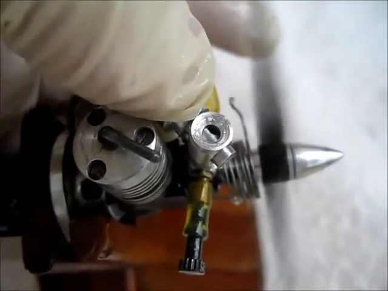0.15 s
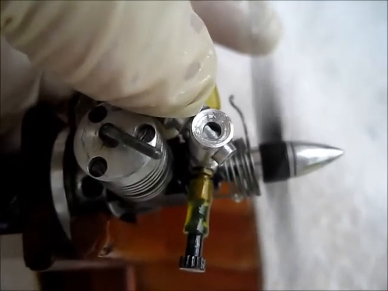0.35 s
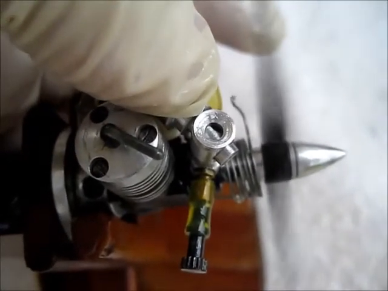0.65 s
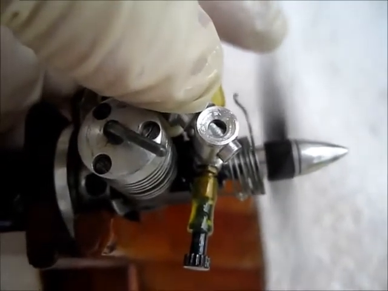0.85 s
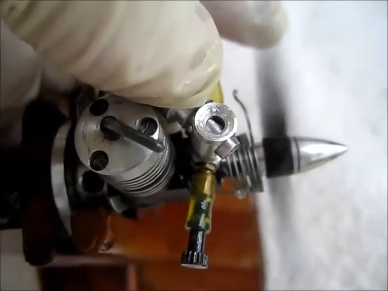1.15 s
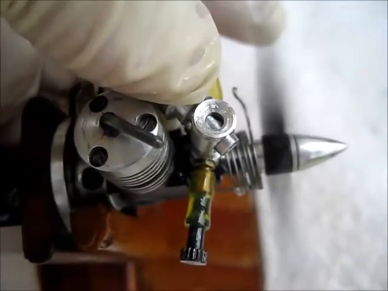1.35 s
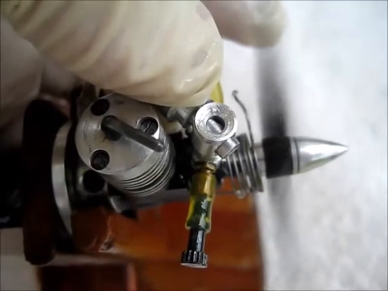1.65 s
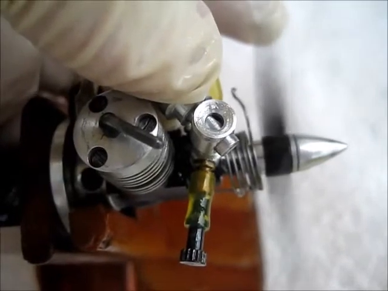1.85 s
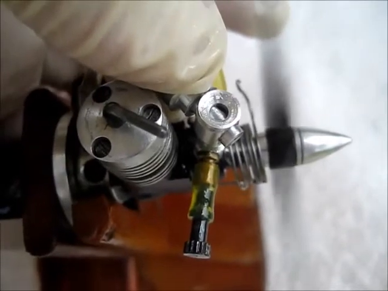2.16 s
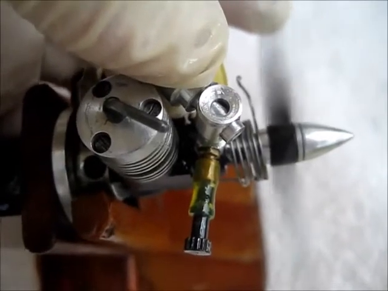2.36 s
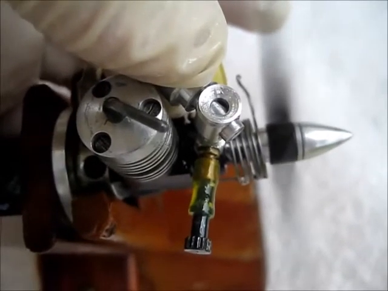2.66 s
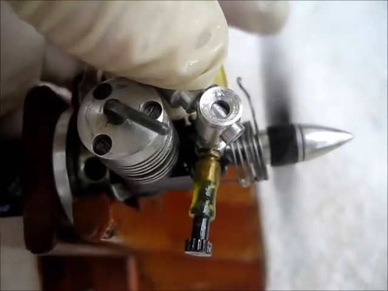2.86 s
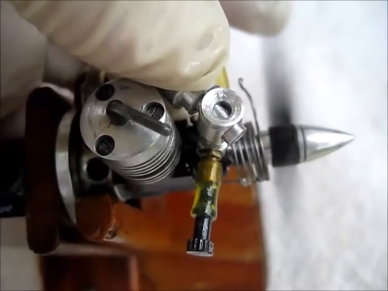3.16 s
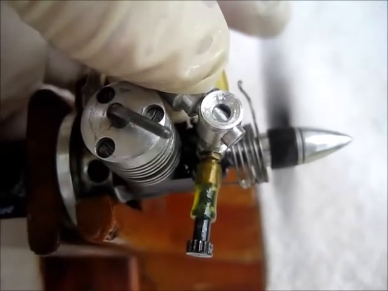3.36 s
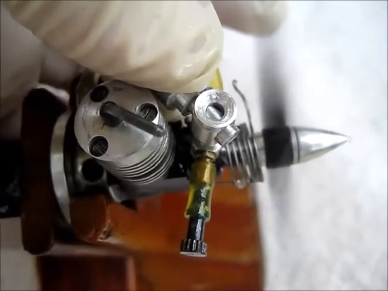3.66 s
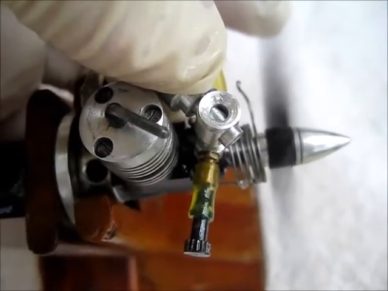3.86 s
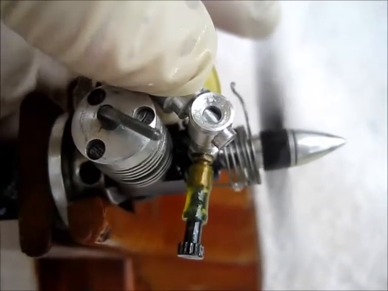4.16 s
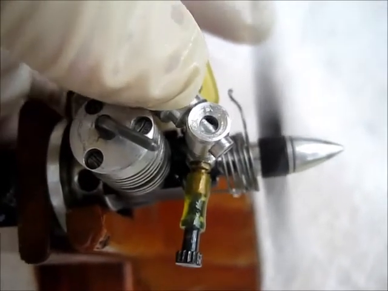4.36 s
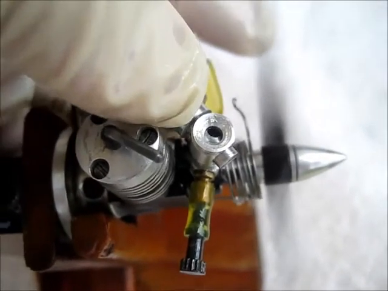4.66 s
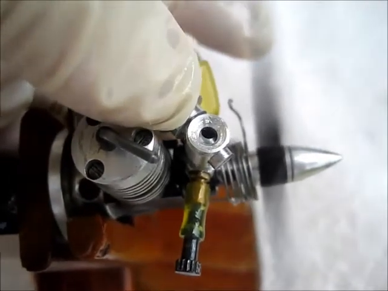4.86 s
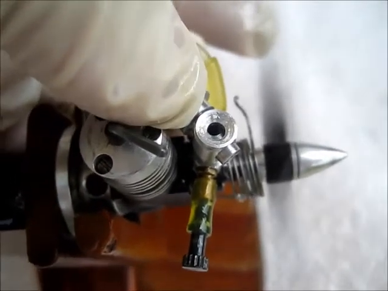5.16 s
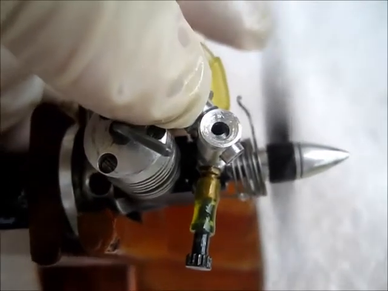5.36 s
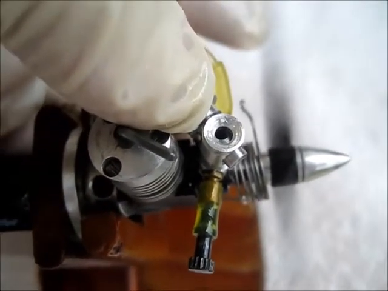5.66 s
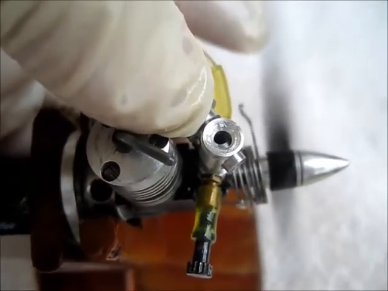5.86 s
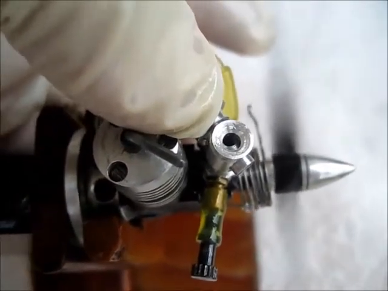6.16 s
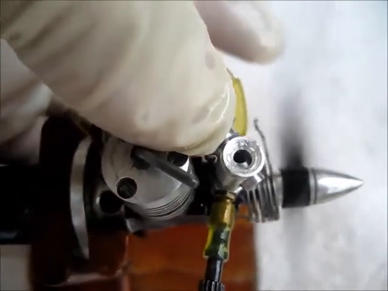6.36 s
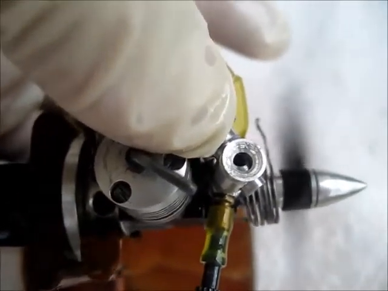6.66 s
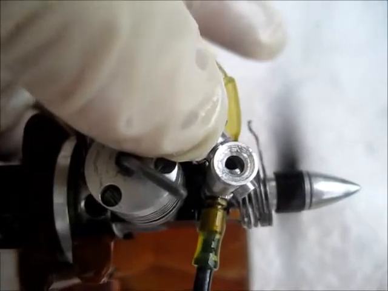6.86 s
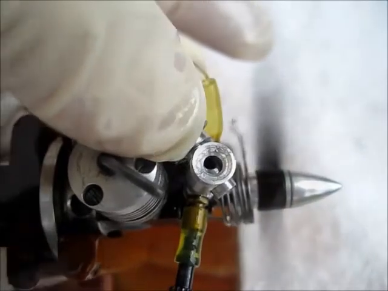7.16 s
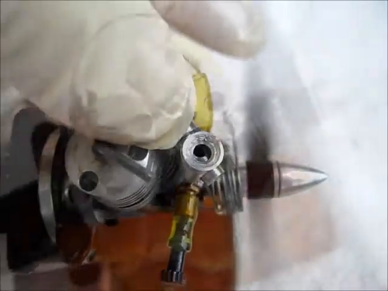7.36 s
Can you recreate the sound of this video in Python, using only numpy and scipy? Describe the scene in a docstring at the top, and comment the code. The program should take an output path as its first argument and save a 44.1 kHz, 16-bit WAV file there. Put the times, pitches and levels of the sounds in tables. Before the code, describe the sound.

A tiny two-stroke model engine buzzes very close, harsh and high-pitched, with small stumbles and rattling spells, its buzz doubling after a thump near the end.

```python
"""Indoors at an engine stand, microphone very close: a tiny two-stroke model diesel at about 11000 rpm.
Every turn fires one sharp exhaust crack with a puff of hiss; the two-blade propeller hums louder with speed.
Now and then it misfires on alternate turns, sags and recovers; in four spells a loose part rattles.
A hand moves over the cylinder and colours the sound; draught rumbles faintly on the microphone.
Near the end, with a low thump, the buzz doubles: a second train of cracks slides against the first."""
import sys
import numpy as np
from scipy import signal
from scipy.fft import rfft, irfft
from scipy.io import wavfile
from scipy.ndimage import uniform_filter1d

SR = 44100
rng = np.random.default_rng(int(sys.argv[2]) if len(sys.argv) > 2 else 0)


def output_pcm(signal):
    """Save a mono or channel-first signal as 16-bit PCM at the path in sys.argv[1].

    Samples are clipped to [-1, 1] before scaling.
    """
    pcm = np.clip(np.atleast_2d(signal).T, -1, 1) * 32767
    wavfile.write(sys.argv[1], SR, np.round(pcm).astype(np.int16))


N = 330750
TIME = np.arange(N) / SR


def from_db(db):
    """Decibels to gain."""
    return 10 ** (np.asarray(db) / 20)


def curve(rows, at=TIME):
    """A two-column curve, read at the given times by straight lines between its points."""
    t, values = np.transpose(rows)
    return np.interp(at, t, values)


def colour(x, spectrum=None, peaks=(), size=4096):
    """Causal (minimum-phase) filter from a smooth spectrum plus narrow peaks and dips."""
    hz = np.maximum(np.arange(size // 2 + 1) * SR / size, 1)
    db = np.zeros(len(hz))
    if spectrum is not None:
        points_hz, points_db = np.transpose(spectrum)
        db = np.interp(np.log(hz), np.log(points_hz), points_db)
    for centre, width, peak_db in peaks:
        db = db + peak_db / (1 + (2 * (hz - centre) / width) ** 2)
    # folding the cepstrum onto positive times makes the phase minimal
    cepstrum = irfft(np.log(from_db(db)))
    fold = np.r_[1, np.full(size // 2 - 1, 2), 1, np.zeros(size // 2 - 1)]
    impulse = irfft(np.exp(rfft(cepstrum * fold)))
    return signal.fftconvolve(x, impulse)[:N]


def noise(spectrum):
    """Coloured noise of rms 1."""
    x = colour(rng.standard_normal(N), spectrum)
    return x / x.std()


def waver(rate):
    """Smooth chance of spread 1 that changes about rate times a second."""
    lowpass = signal.butter(2, rate, fs=SR, output="sos")
    slow = signal.sosfilt(lowpass, rng.standard_normal(N + SR))[SR:]  # the first second settles the filter
    return slow / slow.std()


def bump(t, half_s):
    """A smooth bell of height 1 around a moment."""
    return np.exp(-np.minimum(((TIME - t) / half_s) ** 2, 20))


def clicks(times, heights, size=8):
    """Band-limited clicks, placed between samples."""
    at = np.floor(times * SR).astype(int)[:, None] + np.arange(1 - size, size + 1)
    offset = at - times[:, None] * SR
    shapes = heights[:, None] * np.sinc(offset) * np.sinc(offset / size)
    inside = (at >= 0) & (at < N)
    return np.bincount(at[inside], shapes[inside], N)


def smear(x, corner_hz):
    """An all-pass: the lows of a click arrive slightly after its highs."""
    pole = np.exp(-2 * np.pi * corner_hz / SR)
    return signal.lfilter([-pole, 1], [1, -pole], x)


# low rumbling noise: (f/Hz, relative level/dB per Hz)
RUMBLE = [(20, 0), (60, -1), (120, -2), (220, -10), (600, -30), (3000, -60)]
# gusts in the draught, and at 7.07 s the low thump as the second buzz sets in:
# (t/s, peak rms level/dB, half-length/s)
GUSTS_AND_THUMP = [(.02, -59, .025), (.65, -59, .015), (1.09, -65, .04), (2.3, -65, .04), (2.66, -59, .06),
                   (4.89, -65, .08), (6.71, -63, .03), (7.07, -52, .02)]


def draught(steady_db=-69.5, swing_db=2.5, swings_per_s=4):
    """Propeller air rumbles faintly on the microphone, with gusts; a short burst of the same low noise thumps
    as the second buzz sets in."""
    steady = from_db(steady_db + swing_db * waver(swings_per_s))
    bursts = sum(from_db(db) * bump(t, half_s) for t, db, half_s in GUSTS_AND_THUMP)
    return (steady + bursts) * noise(RUMBLE)


def room(x, t60_s=.12, wet_db=-15, low_hz=800, wall_hz=9000):
    """Faint, slightly dull reflections from bench and walls, as a decaying burst of noise."""
    t = TIME[:SR // 2]
    tail = rng.standard_normal(len(t)) * from_db(-60 * t / t60_s)
    tail = tail * (t > .002)  # nothing returns in the first 2 ms
    tail = tail / np.linalg.norm(tail)
    tail = signal.sosfilt(signal.butter(1, [low_hz, wall_hz], "band", fs=SR, output="sos"), tail)
    return x + from_db(wet_db) * signal.fftconvolve(x, tail)[:N]


# the hand moves over the cylinder: (t/s, share of cover 0-1)
HAND = [(0, .3), (.7, .25), (2.2, 0), (4.15, 0), (4.65, .85), (5.5, 1), (7.5, 1)]


def hand_cover():
    """Share of the cylinder that the hand covers, which colours the cracks and lifts hum and hiss."""
    return curve(HAND)


# crankshaft speed while every charge burns: (t/s, speed/turns per s)
SPEED = [(0.0, 198.0), (0.06, 200.29), (0.24, 194.18), (0.75, 198.36), (1.08, 188.61), (1.43, 190.97),
         (2.01, 179.82), (2.25, 189.17), (2.36, 186.19), (2.67, 184.86), (2.78, 189.51), (3.06, 180.08),
         (3.2, 182.41), (3.48, 180.03), (3.53, 185.4), (3.74, 183.76), (4.08, 187.18), (4.2, 183.33),
         (4.65, 192.23), (4.93, 192.91), (5.07, 189.57), (5.21, 179.02), (5.34, 188.49), (5.56, 196.46),
         (5.68, 193.95), (5.87, 199.23), (6.59, 197.47), (6.99, 202.86), (7.05, 200.62), (7.5, 200.48)]
# stumbles, in which every second firing is weak: (t/s, level/dB re a normal firing, number of weak firings)
MISFIRES = [(.035, -5, 1), (.091, -8, 3), (.173, -13, 4), (.279, -7, 2), (.364, -5, 1), (.437, -7, 2),
            (.53, -14, 1), (.64, -4, 1), (2.125, -6, 1), (2.146, -4, 1), (3.735, -12, 2), (4.218, -6, 1),
            (4.251, -4, 3), (5.743, -5, 1), (5.809, -10, 1), (5.835, -13, 1), (5.967, -6, 1),
            (6.225, -6, 1), (6.701, -6, 2)]


def weak_firings():
    """Each stumble as single weak firings, two turns apart: (t/s, level/dB)."""
    weak = []
    for t, db, count in MISFIRES:
        two_turns_s = 2 / curve(SPEED, t)
        weak += [(t + k * two_turns_s, db) for k in range(round(count))]
    return weak


def shaft_speed(sag_turns_per_s=2.34, recover_s=.14):
    """Turns per s: every weak firing takes away a share of the full sag, which soon comes back."""
    t, db = np.transpose(weak_firings())
    lost = np.bincount((t * SR).astype(int), 1 - from_db(db), N)
    sag = signal.lfilter([1], [1, -np.exp(-1 / (recover_s * SR))], lost)
    return curve(SPEED) - sag_turns_per_s * sag


def unevenness(speed, scatter_db=1.1, stumble_db=1, reach_s=.1, lean_db=.6, lean_turns_per_s=196):
    """Scatter setting of the firings in dB: larger around stumbles and at top speed."""
    lost = sum(bump(t, reach_s) * count * (1 - from_db(db)) for t, db, count in MISFIRES)
    lean = (1 + np.tanh(speed - lean_turns_per_s)) / 2
    return scatter_db + stumble_db * np.tanh(lost) + lean_db * lean


def crank(speed, spread_db, hunt_turns=.0055, hunt_rate=6, flutter_turns=.0033, flutter_rate=22):
    """Crank angle in turns; uneven burning makes the light shaft hunt slowly and flutter fast around it."""
    # both swings are in turns per dB of spread
    swing = hunt_turns * waver(hunt_rate) + flutter_turns * waver(flutter_rate)
    return np.cumsum(speed) / SR + spread_db * swing


def passes(turns, angle):
    """Moments at which the crank passes an angle (in turns)."""
    marks = np.arange(np.ceil(turns[-1])) + angle
    reached = marks[(marks > turns[0]) & (marks < turns[-1])]
    return np.interp(reached, turns, TIME)


# tones of shaft and propeller: (multiple of the speed, level/dB re the blade tone)
SHAFT_TONES = [(1, -20.5), (2, 0), (3, -19), (4, -22)]


def propeller(turns, speed, blade_db=-39, at_turns_per_s=190, speed_power=1.7, hand_db=.8,
              flutter_db=.45, flutter_rate=30):
    """Two blades give a strong tone at twice the shaft speed, louder when faster, fluttering in their wash."""
    tones = sum(from_db(db) * -np.cos(2 * np.pi * round(k) * turns) for k, db in SHAFT_TONES)
    level_db = blade_db + hand_db * hand_cover() + flutter_db * waver(flutter_rate)
    peak = np.sqrt(2) * from_db(level_db)  # from rms
    return peak * (speed / at_turns_per_s) ** speed_power * tones


# turbulence of exhaust gas and propeller wash: (f/Hz, relative level/dB per Hz)
TURBULENCE = [(60, -17), (200, -13), (350, -3), (700, -9), (1200, -4), (3000, -1.5), (6000, 2), (7300, -1),
              (8800, 1), (11000, -2), (13500, -5.5), (15700, -4)]


def hiss(fired, puff_db=-31.5, puff_s=.0009, wash_db=-41.2, hand_db=1.5):
    """A puff of gas follows each crack, over the steady wash of the propeller; the hand throws both back."""
    puff = signal.lfilter([1], [1, -np.exp(-1 / (puff_s * SR))], fired)
    puffs = from_db(puff_db) * puff * noise(TURBULENCE)
    wash = from_db(wash_db) * noise(TURBULENCE)
    return (puffs + wash) * from_db(hand_db * hand_cover())


# spells of rattling: (start t/s, end t/s, swell/s, fade/s, level/dB before colouring,
# downstroke tap level/dB re upstroke tap, share of double strike 0-1)
RATTLES = [(.65, 1.27, .33, .2, -2.5, 2.5, 0), (1.62, 2.15, .22, .09, -2, 3, 0),
           (3.08, 3.47, .2, .12, -3, 3, 0), (4.93, 5.28, .04, .1, .3, -2.5, .85)]
# spectrum of one tap: (f/Hz, level/dB)
TAP = [(400, -32), (800, -27), (1200, -14), (2200, -4), (3400, 0), (4700, -1), (6500, -15), (7800, -12),
       (9600, -5), (12700, -12), (14500, -9), (16000, -14)]


def rattle(turns, up_angle=.854, down_angle=.347, idle_db=-26, bounce_s=9e-5, early_s=6e-5,
           scatter_db=1.1, jitter_s=7e-6, smear_hz=4000):
    """A loose part hits its seat twice a turn, in spells over faint ticking; the upstroke may strike twice."""
    taps = np.zeros(N)
    for down, angle in enumerate((up_angle, down_angle)):
        times = passes(turns, angle)
        chance = rng.standard_normal((len(times), 2))
        heights, double = from_db(idle_db), 0
        for start, end, swell_s, fade_s, db, down_db, share in RATTLES:
            spell = np.clip(np.minimum((times - start) / swell_s, (end - times) / fade_s), 0, 1)
            heights = heights + spell * from_db(db + down * down_db)
            double = double + spell * share * (1 - down)
        heights = heights * from_db(scatter_db * chance[:, 0])
        first = times + jitter_s * chance[:, 1] - early_s * double
        taps += clicks(first, heights)
        taps += clicks(first + bounce_s, heights * double)
    return colour(smear(taps, smear_hz), TAP)


# the second buzz, from the moment it sets in: (t/s, lead over the first/turns)
SECOND_LEAD = [(7.064, 0), (7.095, .05), (7.15, .24), (7.2, .52), (7.255, .91), (7.29, 1.065), (7.33, 1.07),
               (7.38, .96), (7.42, .87), (7.5, .37)]
# its thinner, more nasal colour: (f/Hz, width/Hz, level/dB)
SECOND_COLOUR = [(1150, 500, -5), (3000, 2000, 3.5)]


def second_buzz(turns, speed, spread_db, level_db=-.5, ragged_db=1):
    """The same buzz again, a little more ragged: it starts in step, gains a whole turn and falls back."""
    sliding = buzz(turns + curve(SECOND_LEAD), speed, spread_db + ragged_db)
    started = TIME >= SECOND_LEAD[0][0]
    return from_db(level_db) * colour(started * sliding, peaks=SECOND_COLOUR)


def firings(turns, spread_db, port_angle=.037, carry_over=.4, slow_share=.38, ceiling=.07, rebound=.1,
            late_s_per_db=6e-6, jitter_s_per_db=5e-6, body_share=.5, body_hz=1900):
    """One firing a turn; a weak burn leaves fuel behind, so the next is stronger."""
    times = passes(turns, port_angle)
    scatter_db = np.interp(times, TIME, spread_db)
    chance = rng.standard_normal((len(times), 3))
    uneven = signal.lfilter([1], [1, carry_over], chance[:, 0])
    mixture = uniform_filter1d(chance[:, 2], size=12)  # drifts over a dozen turns
    swing_db = scatter_db * (uneven / uneven.std() + slow_share * mixture / mixture.std())
    # a full burn cannot get much stronger, a poor one can get much weaker
    swing_db = swing_db - ceiling * (np.maximum(swing_db, 0) ** 2 + swing_db ** 2) / 2
    for t, weak_db in weak_firings():
        k = np.argmin(abs(times - t))
        swing_db[k:k + 2] = weak_db, -rebound * weak_db
    # stronger firings come slightly later
    times = times + late_s_per_db * swing_db + jitter_s_per_db * scatter_db * chance[:, 1]
    # the sharp edge of a crack follows the burn closely, its low body much less
    edge = clicks(times, from_db(swing_db))
    body = clicks(times, from_db(body_share * swing_db))
    return edge + signal.sosfilt(signal.butter(1, body_hz, fs=SR, output="sos"), body - edge)


# spectrum of one exhaust crack: (f/Hz, level/dB)
CRACK = [(300, -32), (750, -33), (930, 0), (1350, 4.3), (1750, 0), (2400, -.7), (3350, 3.0), (5250, 5.6),
         (5750, 12), (6700, 9.7), (7400, 4.5), (9000, 2), (10000, -1), (15500, -9)]
# peaks and dips from nearby reflections, with the hand back: (f/Hz, width/Hz, level/dB)
HAND_BACK = [(1680, 200, -2), (2400, 350, -3), (2980, 150, 3), (10400, 700, 3), (11700, 500, -16),
             (13100, 600, -8), (15200, 700, 2)]
# the same with the hand over the cylinder: (f/Hz, width/Hz, level/dB)
HAND_OVER = [(1450, 300, 3), (2050, 300, 5), (2420, 200, -3), (3150, 200, -3), (10000, 700, -5),
             (11100, 600, 2), (13250, 500, -11), (14650, 900, -12)]


def exhaust(fired, crack_db=0.1, smear_hz=4300):
    """The port opens with a crack, smeared a little on its way out and coloured by the nearby hand."""
    crack = -from_db(crack_db) * smear(fired, smear_hz)
    cover = hand_cover()
    uncovered = colour(crack, CRACK, HAND_BACK)
    covered = colour(crack, CRACK, HAND_OVER)
    return (1 - cover) * uncovered + cover * covered


def buzz(turns, speed, spread_db):
    """Exhaust cracks, their hiss and the propeller tones, driven by one crank, over the steady wash."""
    fired = firings(turns, spread_db)
    return exhaust(fired) + hiss(fired) + propeller(turns, speed)


def scene():
    """The engine with its rattle and the second buzz, in the room; draught at the microphone, and a low thump
    as the second buzz sets in."""
    speed = shaft_speed()
    spread_db = unevenness(speed)
    turns = crank(speed, spread_db)
    engine = buzz(turns, speed, spread_db) + rattle(turns) + second_buzz(turns, speed, spread_db)
    return (room(engine) + draught())[None]


# the microphone's notch and the peak above it: (f/Hz, width/Hz, level/dB)
MIC_NOTCH = [(7930, 400, -20), (8780, 480, 5)]


def record(dry, cutoff_hz=15900):
    """The microphone has one narrow notch; peaks stop at full scale and the top is cut."""
    heard = np.clip(colour(dry[0], peaks=MIC_NOTCH), -1, 1)
    top_cut = signal.ellip(12, .1, 85, cutoff_hz, fs=SR, output="sos")  # ripple and stopband in dB
    return signal.sosfilt(top_cut, heard)[None]


dry = scene()
out = record(dry)
output_pcm(out)
```